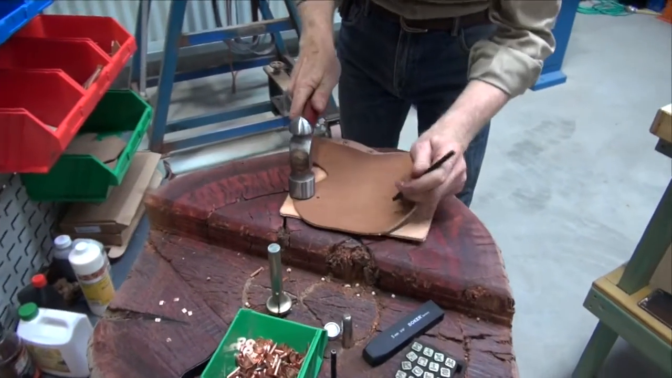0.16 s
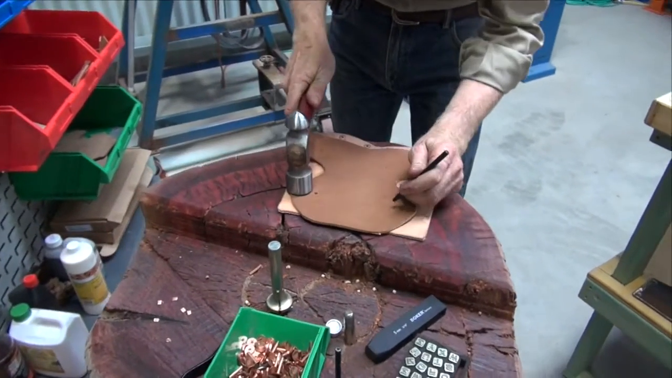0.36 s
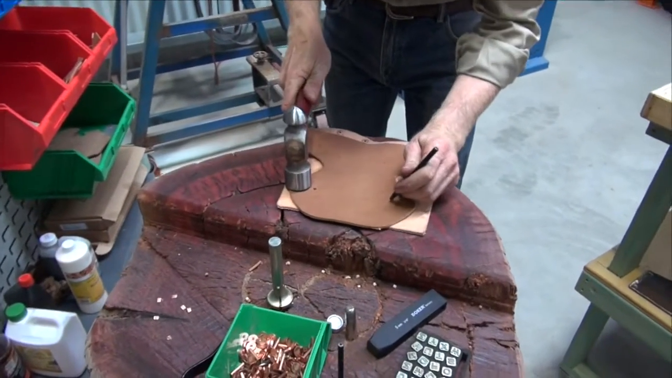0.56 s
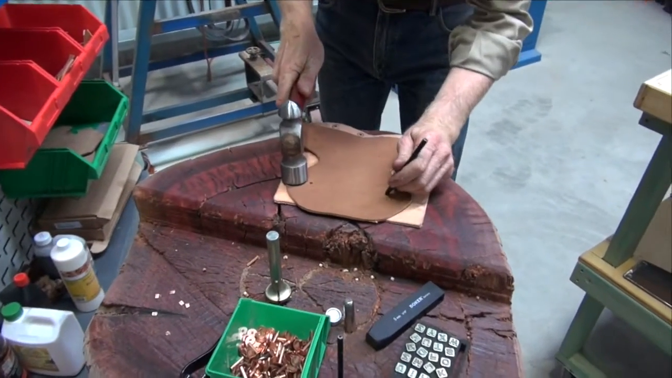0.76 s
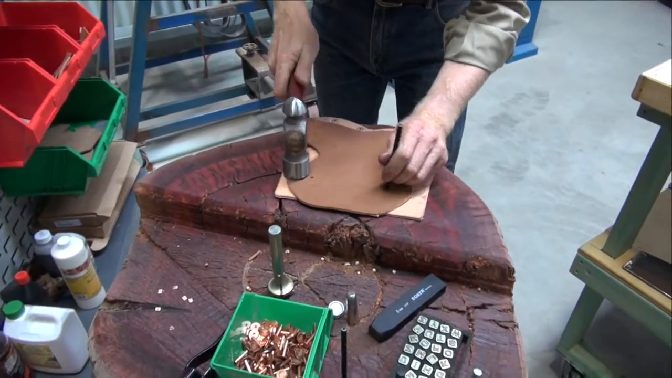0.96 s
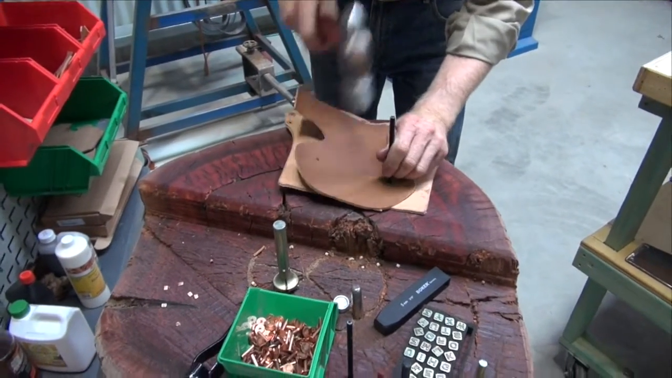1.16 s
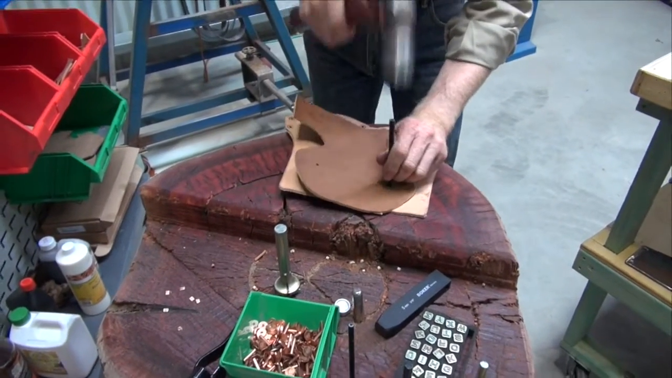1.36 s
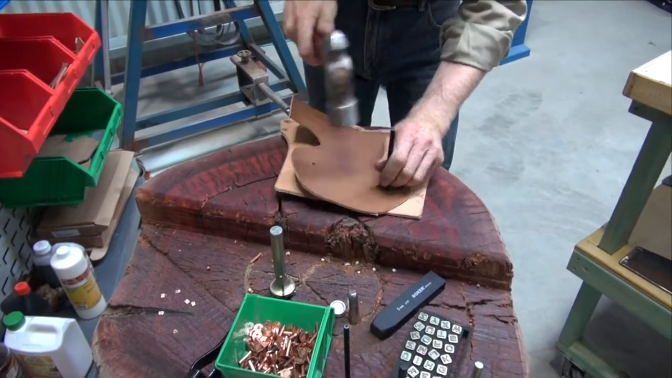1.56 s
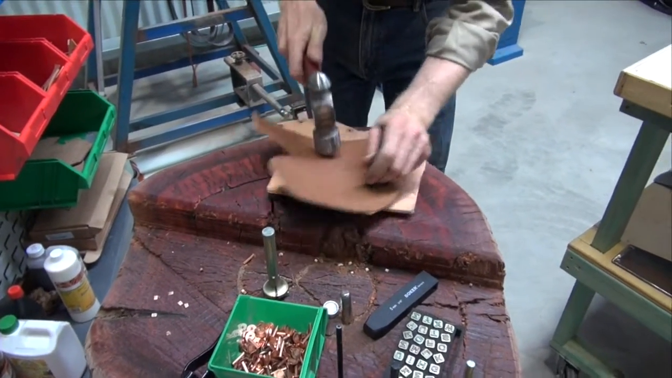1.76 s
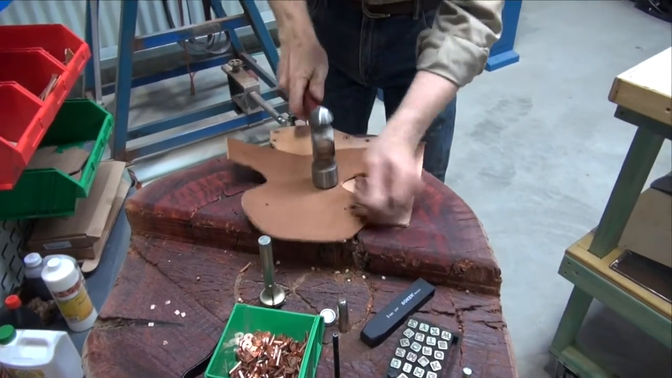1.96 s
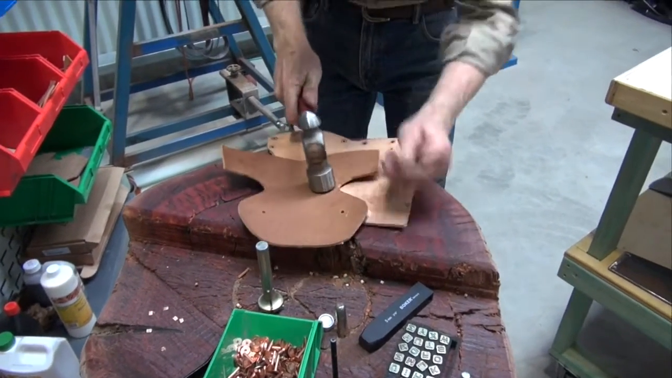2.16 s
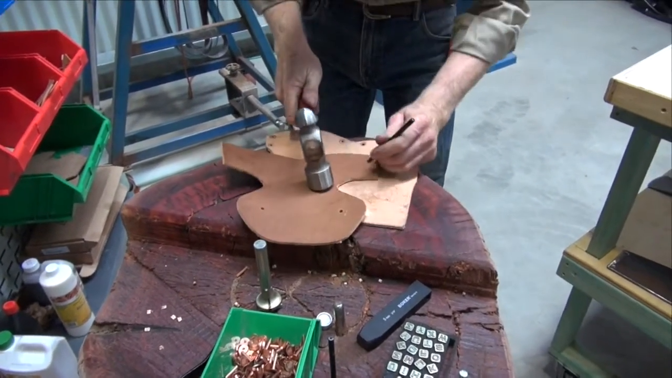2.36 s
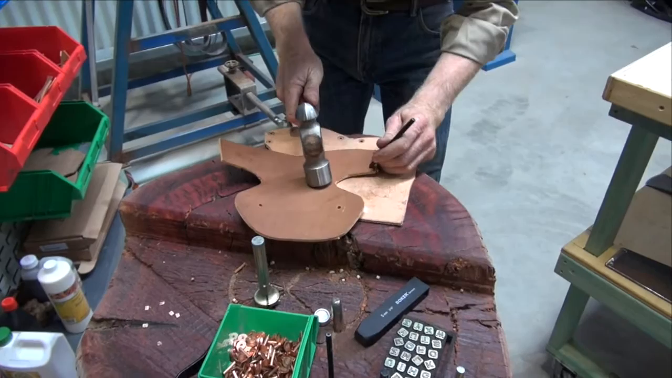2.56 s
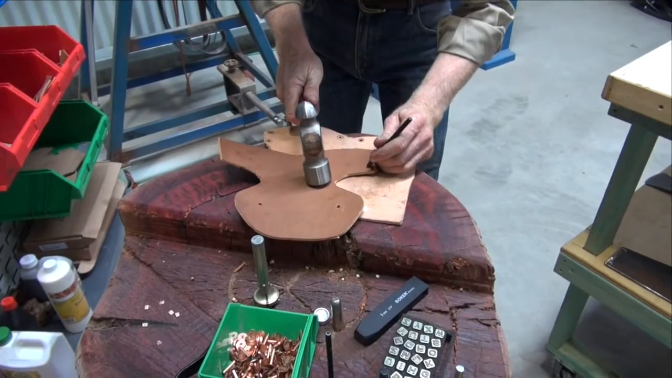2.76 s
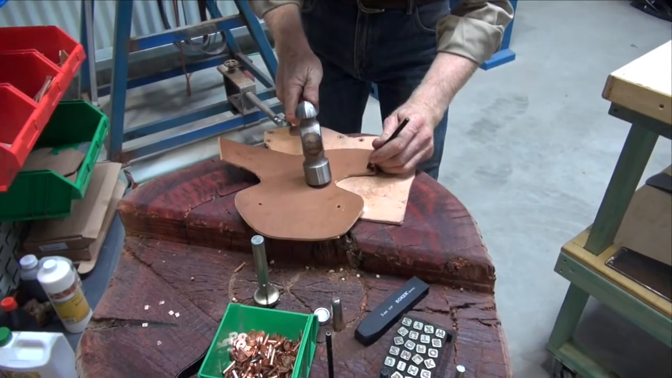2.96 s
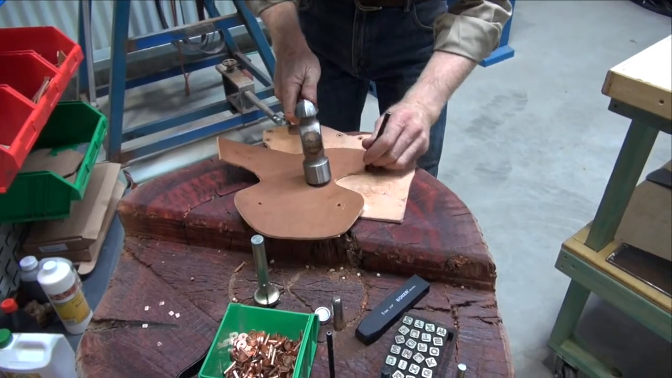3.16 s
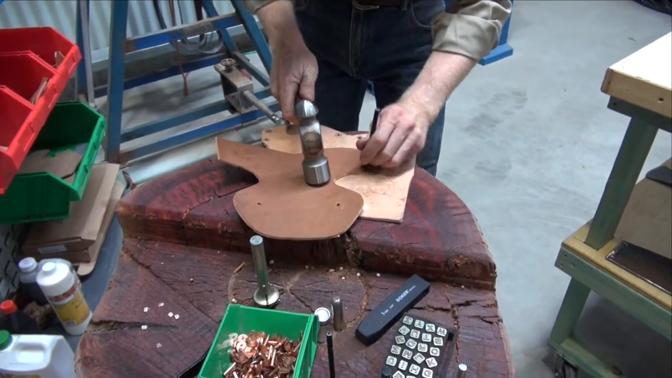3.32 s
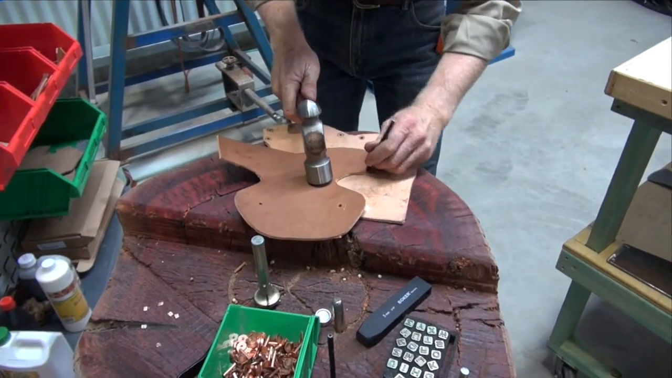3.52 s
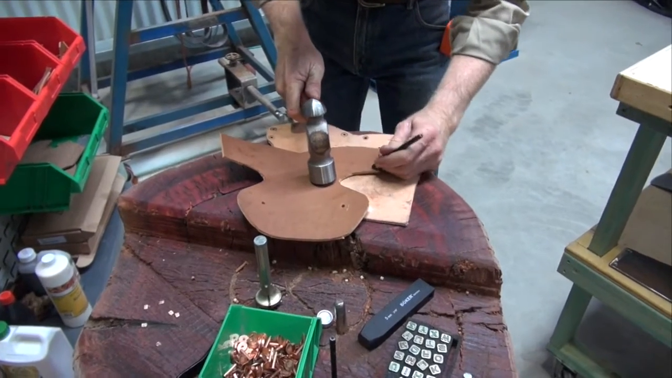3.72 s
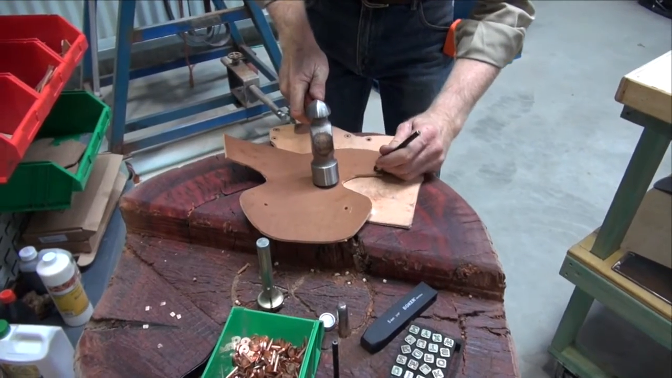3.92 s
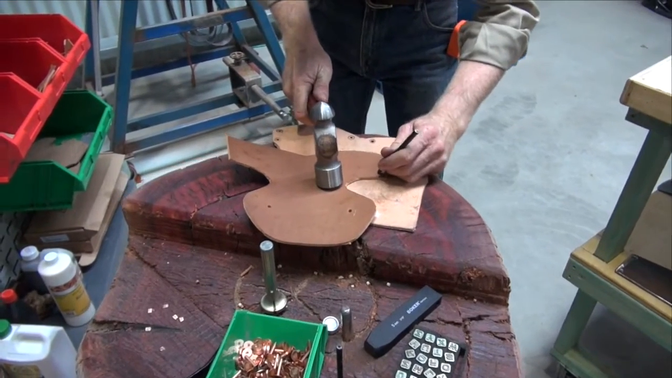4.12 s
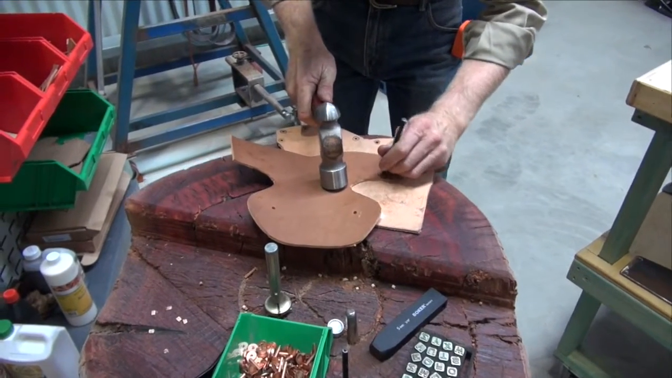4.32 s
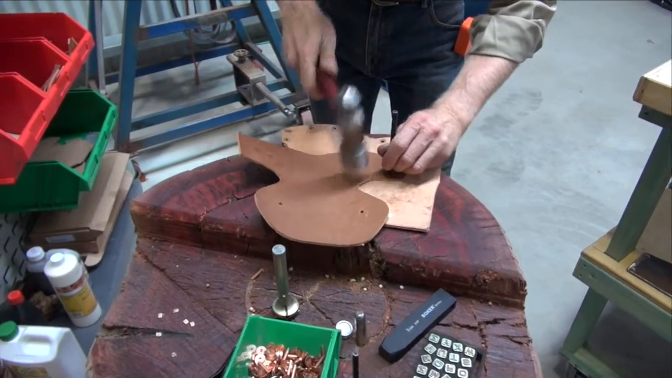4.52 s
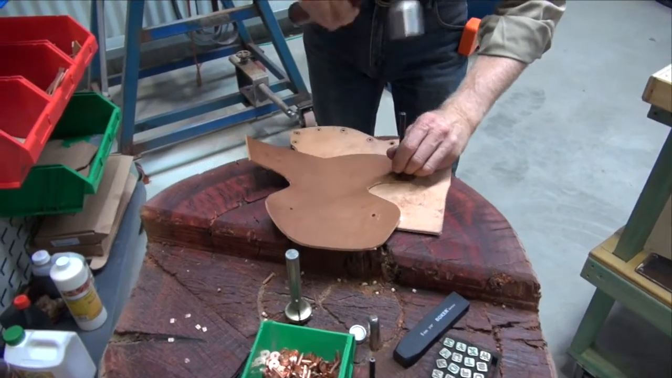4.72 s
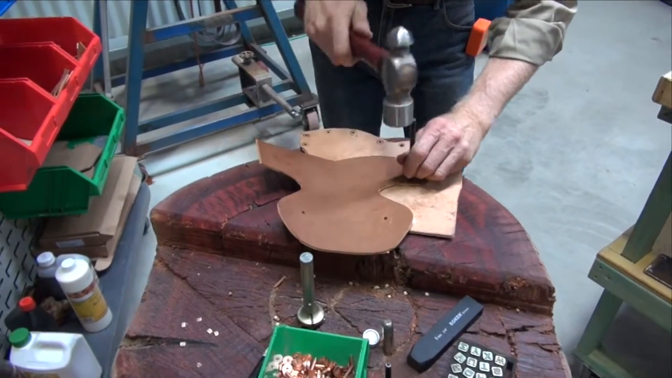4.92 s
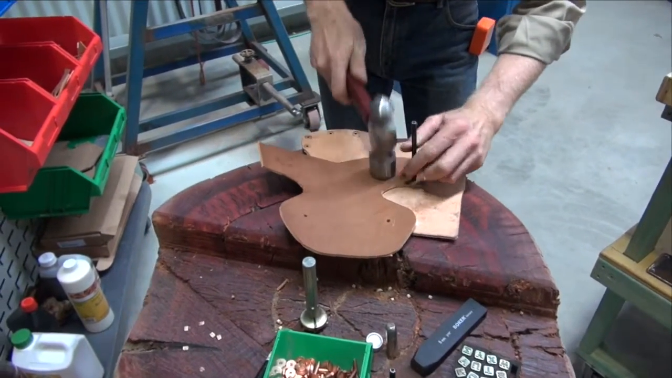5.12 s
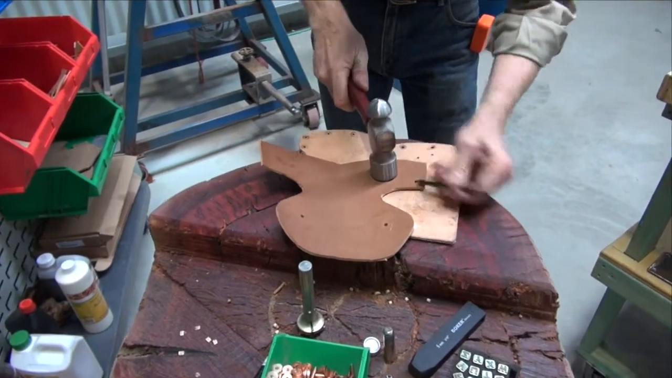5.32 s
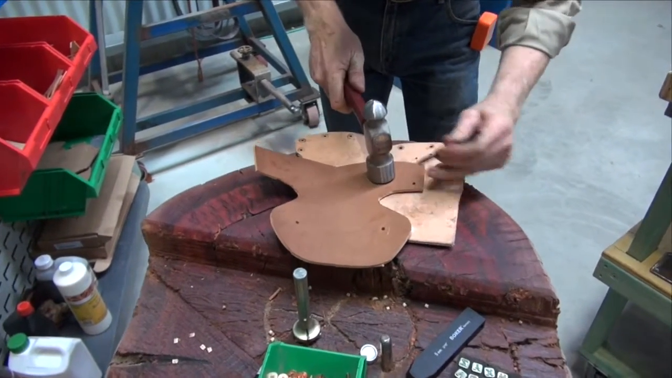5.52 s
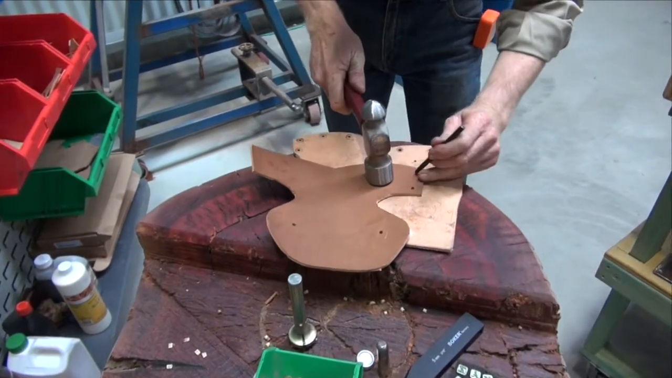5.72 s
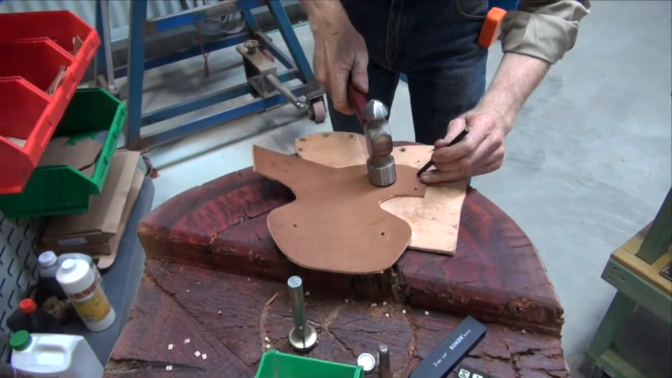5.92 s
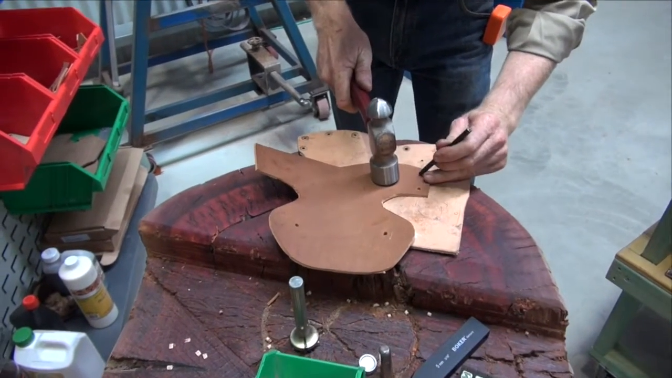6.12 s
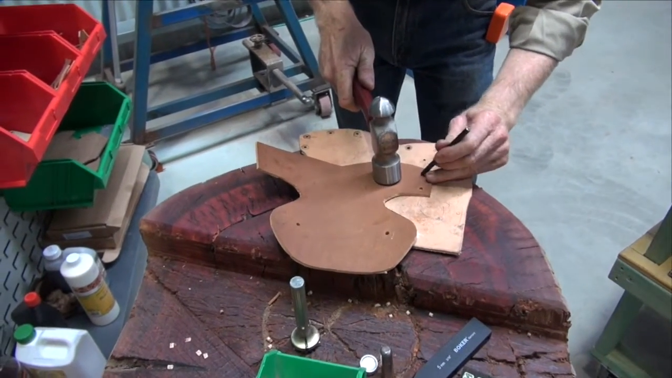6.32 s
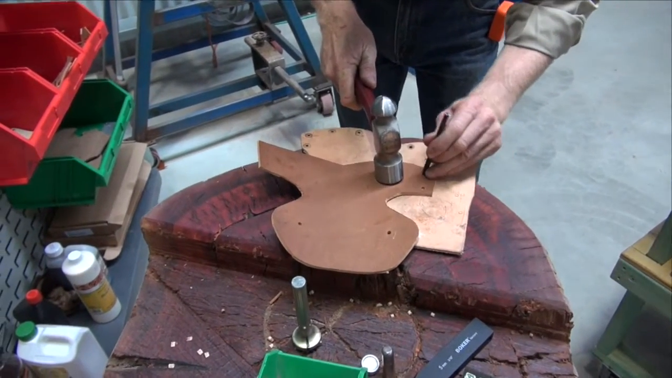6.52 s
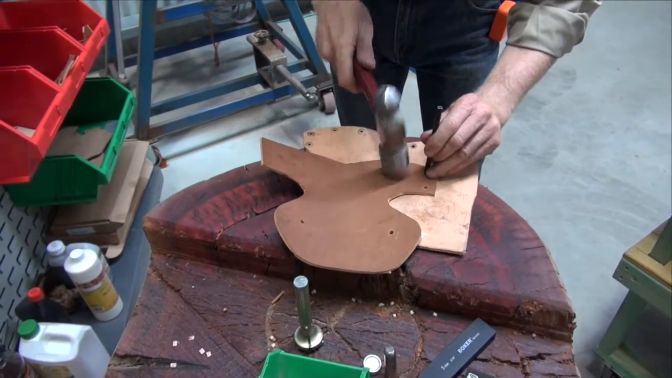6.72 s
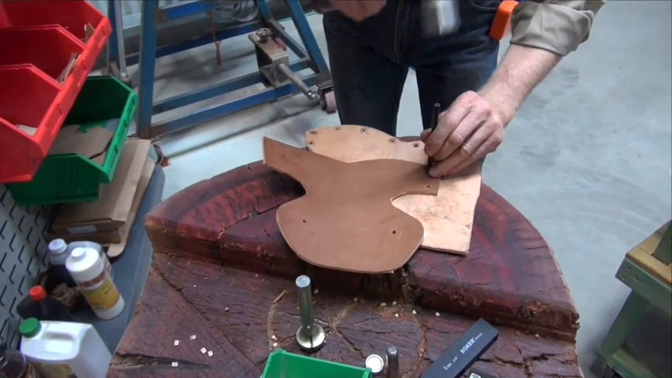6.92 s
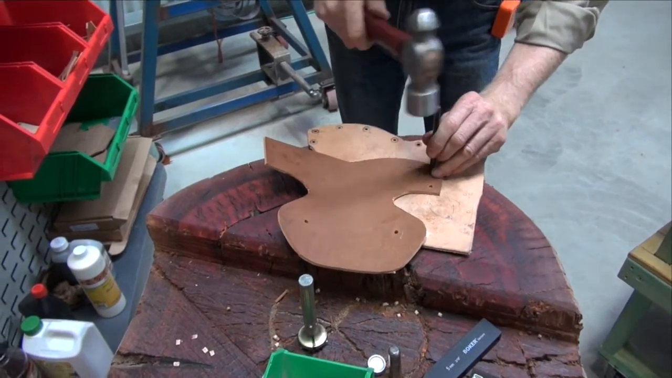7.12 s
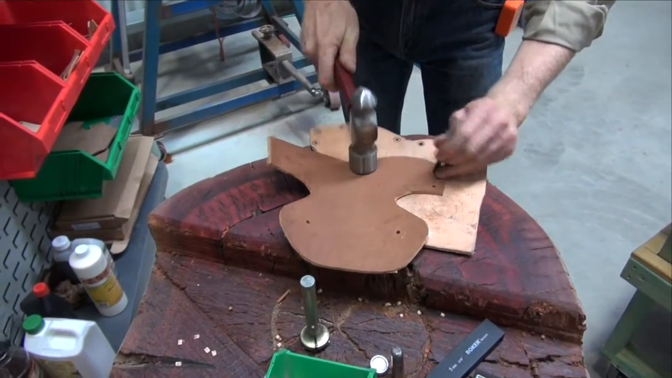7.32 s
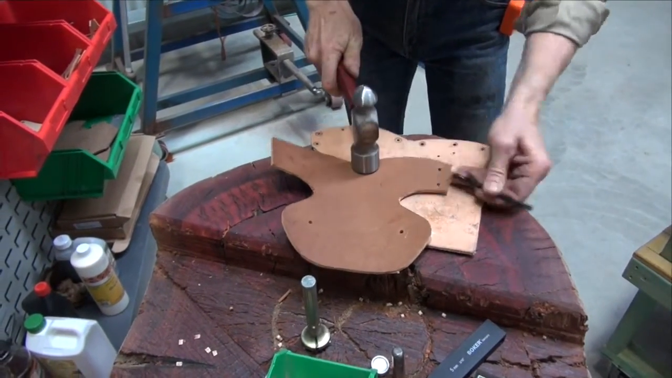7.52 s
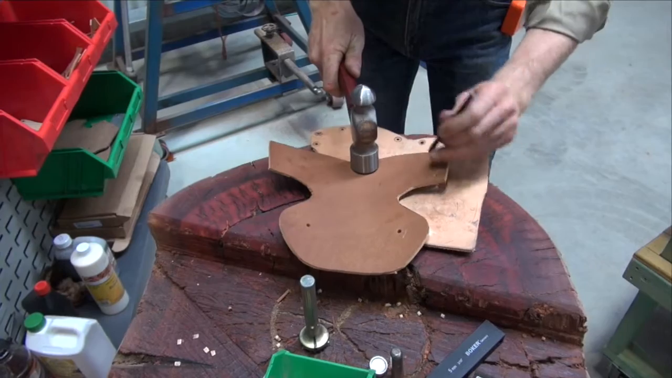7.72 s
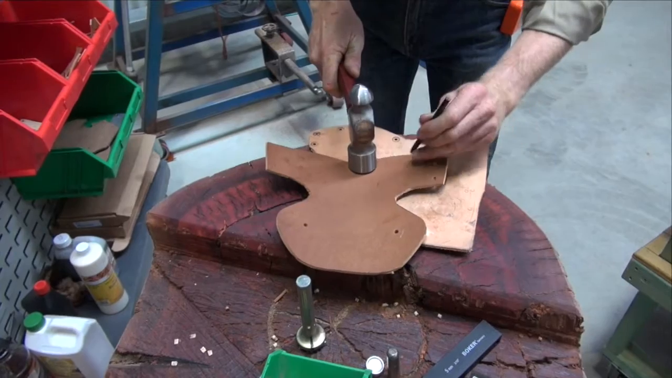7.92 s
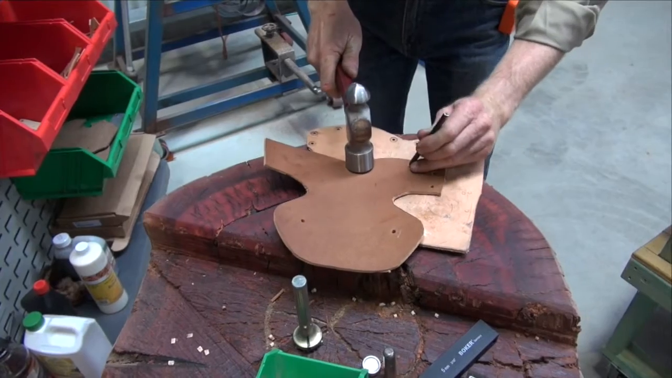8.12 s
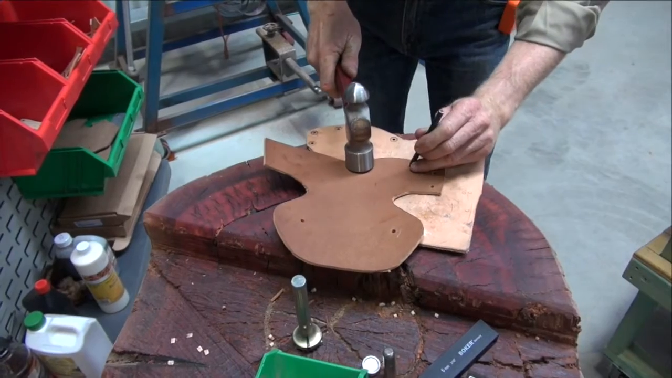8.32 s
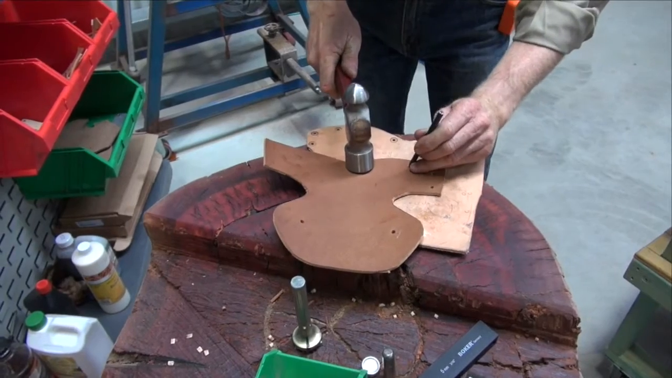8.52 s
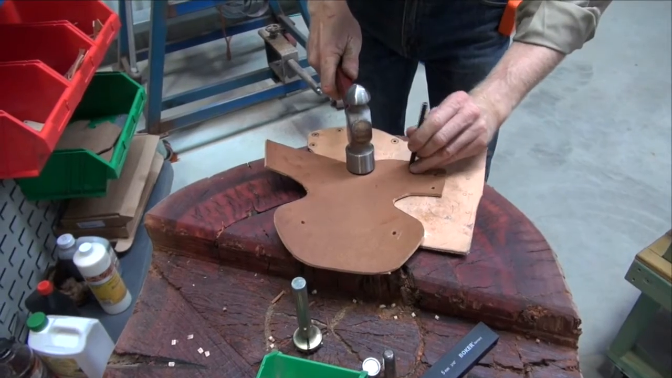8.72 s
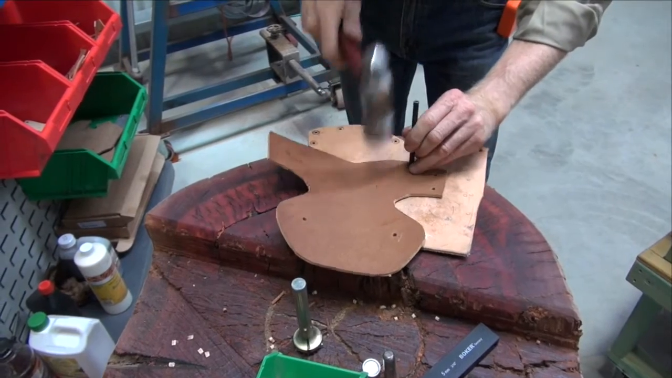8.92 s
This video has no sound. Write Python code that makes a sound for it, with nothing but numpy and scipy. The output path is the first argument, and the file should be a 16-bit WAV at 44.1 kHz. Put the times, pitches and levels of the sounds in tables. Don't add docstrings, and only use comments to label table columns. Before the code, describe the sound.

Three hard, overloaded hammer blows on a steel punch through leather, seconds apart, each followed by clattering tools and long workshop reverberation.

```python
import sys
import numpy as np
from scipy import signal
from scipy.fft import rfft, irfft
from scipy.io import wavfile

SR = 44100
rng = np.random.default_rng(int(sys.argv[2]) if len(sys.argv) > 2 else 0)


def convert_level_to_amplitude(level_db):
    exponent = np.asarray(level_db, float) / 20
    return 10 ** exponent


def persist_wave(psi):
    counts = np.round(np.clip(psi, -1, 1) * 32767).astype(np.int16)
    wavfile.write(sys.argv[1], SR, np.atleast_2d(counts).T)


N = 395577

# start_s, peak_db, tail_db, steel_ring_db
BLOWS = [
    (1.4572, 6.5, 1, -19.5),
    (4.8949, 5, 0.5, -5),
    (7.1029, 6.5, 1, -4.5),
]
# start_s, level_db
CEILING_ECHOES = [(1.4905, -16.5), (4.9254, -19.5), (7.1395, -16)]
# pitch_hz, width_hz, lift_db
STEEL_BANDS = [
    [(3820, 700, -2.5), (5900, 280, 4.5), (7250, 180, 7.5), (10000, 300, -3), (13090, 470, 9)],
    [(3960, 300, 1), (4600, 250, -3), (5900, 240, 2.5), (7528.4, 270, 7.5), (12200, 250, -13),
     (13100, 320, 13.5)],
    [(3440, 590, -1), (4870, 250, -7), (6430, 390, 2), (8400, 250, 3), (12118, 390, 0), (15000, 300, 13)],
]
# pitch_hz, level_db (per Hz)
FLASH = [(240, -46.5), (400, -24.5), (1450, -17.5), (4930, -3.5), (6030, -1.5), (7730, 3.5), (9320, -9),
         (14800, 4), (16300, -8.5)]
# pitch_hz, level_db (per Hz)
CRACK = [(88, -38), (150, -15.5), (265, -17.5), (400, -6.5), (547, -13.5), (794, -10), (1580, -11),
         (5990, -6), (10400, -4.5), (13100, -9), (16300, -27)]
# pitch_hz, level_db, t60_s
PUNCH_MODES = [(7820, -17, 0.06), (8300, -23, 0.04), (8350, -21, 0.029), (12720, -17.5, 0.035),
               (14840, -14, .005), (6060, -11, 0.014)]
# pitch_hz, level_db, t60_s
BOARD_MODES = [(260.3, -5, 0.027), (351.6, -5, 0.036), (385, -4.5, 0.042), (484.4, -2, 0.05),
               (500, -19.5, .15), (566, -4.5, 0.016), (643, -7, 0.046), (711, -5, 0.038), (825, -5, 0.034),
               (1100, -9, 0.039)]
# start_s, click_db, click_hz, board_thud_db
FIRST_DROP = [(1.7642, -16, 1110, -30), (1.9, -31.5, 980, -28), (1.9158, -27, 1800, -29),
              (1.927, -24.5, 1019, -37), (1.9442, -1.5, 1733, -20), (1.9536, -3.5, 1080, -20),
              (1.9584, -9, 3000, -10), (1.9787, -3.5, 1380, -30), (1.989, -11.5, 1430, -16),
              (1.9927, -12, 1660, -27), (1.9985, -14, 1960, -25), (2.007, -5.5, 1107, -42),
              (2.0124, -2, 2360, -16)]
SECOND_DROP = [(5.1929, 4.5, 2740, -1), (5.194, 1.5, 1350, -21), (5.1978, -17, 950, -16),
               (5.2329, -11.5, 2140, -15), (5.2381, -12, 1910, -17.5), (5.2503, -13, 1450, -21),
               (5.2571, -13, 1370, -14.5), (5.2748, -16.5, 980, -17), (5.326, -19.5, 1440, -29),
               (5.337, -11, 1510, -45), (5.3445, -10, 2680, -33), (5.3558, -20, 2800, -34),
               (5.3852, -24, 1100, -33)]
THIRD_DROP = [(7.3784, 2, 2460, -9), (7.3827, -2.5, 1120, -10), (7.3861, -8, 1030, -8),
              (7.4037, -6, 1850, -14.5), (7.431, -18, 1960, -23), (7.4356, -16, 1030, -17.5),
              (7.4425, -19, 1891, -12), (7.4549, 0.5, 2550, -16.5), (7.4658, -4, 2340, -17),
              (7.4802, -8, 2320, -22.5), (7.4902, -4.5, 2340, -18), (7.5175, -32, 900, -29.5)]
# start_s, click_db, click_hz, board_thud_db
TAPS = [(1.0936, -31.5, 2080, -51), (2.3548, -32.5, 4090, -53), (2.4078, -31, 990, -29.5),
        (2.4234, -33, 1270, -34), (2.6075, -42, 900, -35), (3.1512, -32.5, 1260, -39.5),
        (3.1577, -31, 1280, -40), (4.4747, -36, 3600, -60), (1.073, -38, 1194, -50),
        (5.6458, -44, 1210, -40), (5.6937, -30, 950, -30), (6.549, -43, 1120, -43.5),
        (7.7845, -30.5, 1095, -53), (8.0777, -41, 1074, -37), (8.1036, -36, 1060, -36),
        (8.1193, -35, 1480, -43), (8.828, -32, 1230, -51.5), (8.8903, -26.5, 4800, -50)]
# start_s, level_db
TICKS = [(1.1075, -40), (1.959, -14), (1.9793, -15), (1.9985, -27), (2.008, -21), (2.0124, -30),
         (2.599, -44), (3.6698, -35), (4.4747, -30), (5.2503, -20), (5.2571, -7), (7.3788, -12),
         (7.3831, -12), (7.7837, -22), (4.618, -37.5), (8.4606, -43.5), (8.828, -14.5), (8.8904, -26)]
# start_s, level_db
RATTLE = [(5.326, -20), (5.3375, -13), (5.346, -12), (5.355, -24), (5.3605, -21.5)]
# pitch_hz, level_db, t60_s
LOOSE_TOOL_MODES = [(1480, -4.5, 0.013), (2860, -2.5, 0.015)]
# start_s, level_db
BUMP = [(7.742, -36.5)]
# loudest_s, length_s, hiss_db, dull_scuff_db
STROKES = [(0.0, 0.074, -40.5, -55), (0.1, 0.56, -54.5, -66), (0.968, 0.024, -56, -60),
           (1.047, 0.11, -48, -60), (1.92, 0.18, -52, -51), (2.402, 0.23, -58, -58.5),
           (2.545, .12, -60, -63.5), (2.596, 0.025, -53.5, -57), (3.155, 0.041, -49, -47),
           (3.178, 0.018, -57, -56), (3.681, 0.063, -54, -55), (3.719, .05, -57, -57.5),
           (3.769, 0.046, -62, -56.5), (4.176, 0.52, -69.5, -62.5), (4.48, 0.12, -50.5, -58.5),
           (4.511, 0.026, -52, -58.5), (5.38, 0.081, -52, -55.5), (5.552, 0.24, -72, -54.5),
           (5.643, 0.056, -66, -59), (5.994, .15, -75, -61), (6.515, 0.24, -64, -58.5),
           (6.702, 0.052, -61.5, -62.5), (6.826, .15, -75, -56), (7.575, 0.26, -54.5, -67),
           (7.929, 0.19, -71.5, -58.5), (7.977, 0.09, -57, -70), (8.118, .08, -68, -61),
           (8.475, 0.13, -57.5, -59.5), (8.858, .05, -53, -65), (8.878, 0.034, -51.5, -51.5)]
# pitch_hz, level_db (per Hz)
HISS = [(1470, -26), (2500, -8.5), (3880, -1.5), (7850, -7.5), (12500, -5.5), (15500, -9), (16300, -9)]
# pitch_hz, level_db (per Hz)
SCUFF = [(120, -31), (200, -25), (396, -5), (1140, -6.5), (1350, -6.5), (2030, -9.5), (6000, -20),
         (7800, -48), (13200, -120)]
# start_s, length_s, level_db
DRAGS = [(5.592, .05, -54), (7.854, 0.044, -52.5), (7.941, .065, -56)]
# pitch_hz, level_db, t60_s
DRAG_MODES = [(1060, 4, 0.023), (1620, -5.5, .015)]
# pitch_hz, t60_s
SHOP_T60 = [(100, 1.34), (500, 1.03), (2000, 1.34), (6000, 1.33), (10000, 0.43), (16000, 0.69)]
# pitch_hz, left_minus_right_db
TAIL_BALANCE = [(60, 13), (180, 10), (550, 9.5), (1650, 12), (4970, 17), (15000, 10)]
# pitch_hz, level_db (per Hz)
EARLIER = [(88, -31), (150, 0), (349, -2.5), (392, 6.5), (1550, -10), (4550, -10.5), (15100, -17.5),
           (16300, -17)]
# pitch_hz, level_db (per Hz)
AIR = [(15, -55), (25, -43), (49, 2.5), (124, -9.5), (207, -3.5), (328, -14.5), (397, -13.5), (442, -14),
       (971, -16.5), (1240, -19), (1540, -20), (15000, -33.5), (16300, -39)]
# pitch_hz, left_minus_right_db
AIR_BALANCE = [(60, 18.5), (150, 15.5), (380, 3), (950, 2), (2380, -1.5), (5980, -2.0), (15000, -6)]

AIR_DB = -59.5
LEFT_LAG_S = 0.0006
CONTACT_HOLD_S = 0.0018
TICK_UNDER_CLICK_DB = -17
FAR_SIDE_DB, FAR_TICK_DB = -16, -28
SOFTER_IS_DULLER = 0.38
BUMP_HZ, BUMP_T60_S = 104, 0.1487
RISE_SHARE, STROKE_FALL_DB = 0.33, 16


def at_hz(points, hz):
    points = np.array(points)
    return np.interp(np.log(hz + 1e-9), np.log(points[:, 0]), points[:, 1])


def rms_one(x):
    return x / np.sqrt(np.mean(x ** 2) + 1e-20)


def colour(x, spectrum, balance=((1, 0), (2, 0))):
    hz = np.fft.rfftfreq(x.shape[-1], 1 / SR)
    gain_db = at_hz(spectrum, hz) + at_hz(balance, hz) * [[0], [-1]]
    return irfft(rfft(x) * convert_level_to_amplitude(gain_db), x.shape[-1])


def humps(x, peaks):
    hz = np.fft.rfftfreq(x.shape[-1], 1 / SR)
    lift = sum(convert_level_to_amplitude(db) / (1 + ((hz - peak_hz) / width_hz) ** 2) for peak_hz, width_hz, db in peaks)
    return irfft(rfft(x) * (1 + lift), x.shape[-1])


def ring(x, hz, t60):
    r, w = convert_level_to_amplitude(-60 / (t60 * SR)), 2 * np.pi * hz / SR
    return signal.lfilter([0, np.sin(w)], [1, -2 * r * np.cos(w), r * r], x + 1e-18)


def drift(rate):
    knots = rng.standard_normal(int(N / SR * 60) + 3)
    return np.interp(np.arange(N) / SR * min(rate, 59), np.arange(len(knots)), knots)


def smooth(x, tau_s):
    r = np.exp(-1 / (tau_s * SR))
    return signal.lfilter([1 - r], [1, -r], x)


def held(db, db_per_s):
    fall = db_per_s * np.arange(N) / SR
    return np.maximum.accumulate(db + fall, axis=1) - fall


def add(out, s, sound):
    for side, lag in enumerate((LEFT_LAG_S, 0)):
        i = round((s + lag) * SR)
        out[side, i:i + sound.shape[1]] += sound[side, :N - i]


def blows(tail):
    out, t = np.zeros((2, N)), np.arange(SR // 5) / SR
    click = 1. * (t == 0)
    drive = ring(click, 2190, 0.0092)
    for (s, db, tail_db, ring_db), (echo_s, echo_db), peaks in zip(BLOWS, CEILING_ECHOES, STEEL_BANDS):
        noise = rng.standard_normal((3, 2, len(t)))
        crack = rms_one(humps(colour(noise[0], FLASH), peaks))
        wall = rms_one(humps(colour(noise[1], FLASH), peaks))
        ceiling = rms_one(humps(colour(noise[2], CRACK), peaks))

        crack = crack * convert_level_to_amplitude(-60 * np.maximum(t - CONTACT_HOLD_S, 0) / 0.0094)
        struck = click + 0.11 * crack
        rings = sum(convert_level_to_amplitude(m_db + ring_db) * ring(struck, m_hz, t60) for m_hz, m_db, t60 in PUNCH_MODES)
        near = crack * convert_level_to_amplitude([[7.5], [-28]]) + rings * convert_level_to_amplitude([[11], [-10.5]]) + drive * convert_level_to_amplitude([[0.], [-17]])
        add(out, s, convert_level_to_amplitude(db) * near)

        wall_shape = (t / 0.0017) * np.exp(-t / 0.0026)
        add(out, s + 0.0032, convert_level_to_amplitude(db) * wall * wall_shape * convert_level_to_amplitude([[-14.], [-20.5]]))

        rise = t / 0.0006
        slap = convert_level_to_amplitude(2.5) * ceiling * rise * np.exp(-rise) + convert_level_to_amplitude(-1.5) * ring(click, 6000, 0.01)
        add(out, echo_s, slap * convert_level_to_amplitude(echo_db + np.array([[14], [3.]])))
        add(out, s, convert_level_to_amplitude(tail_db - 15.5) * humps(colour(tail, CRACK), peaks))
    return out


def knocks():
    (sharp, deep), t = np.zeros((2, 2, N)), np.arange(SR // 8) / SR
    rows = FIRST_DROP + SECOND_DROP + THIRD_DROP + TAPS
    chance = rng.standard_normal((len(rows), 2, len(BOARD_MODES)))
    grit = rng.standard_normal((len(rows) + len(TICKS), 2, len(t)))
    treble = signal.butter(2, 3400, "high", fs=SR, output="sos")
    ticks = signal.sosfilt(treble, grit) * convert_level_to_amplitude(-60 * t / 0.0067)
    push = (t < 0.0007) * np.sin(np.pi * t / 0.0007) / (0.00065 * SR)
    modes = np.array([convert_level_to_amplitude(m_db) * ring(push, m_hz, t60) * (-1) ** k
                      for k, (m_hz, m_db, t60) in enumerate(BOARD_MODES)])

    for (s, db, hz, thud_db), luck, noise, tick in zip(rows, chance, grit, ticks):
        contact = (t == 0) + 0.081 * noise * convert_level_to_amplitude(-60 * t / 0.02)
        give_hz = min(10.0 * hz * convert_level_to_amplitude(SOFTER_IS_DULLER * db), 0.4 * SR)
        contact = signal.sosfilt(signal.butter(1, give_hz, fs=SR, output="sos"), contact)
        click = ring(contact, hz, 6.25 / hz)
        click = click + convert_level_to_amplitude(-3.0) * ring(contact, 1.76 * hz, 0.0015)
        click = click - convert_level_to_amplitude(-5.5 + SOFTER_IS_DULLER * db) * ring(contact, 4120, 0.0011)
        click = click + convert_level_to_amplitude(TICK_UNDER_CLICK_DB - 4.5) * tick
        add(sharp, s, convert_level_to_amplitude(db + 2.5) * click * convert_level_to_amplitude([[0], [FAR_SIDE_DB]]))
        add(deep, s, convert_level_to_amplitude(thud_db) * convert_level_to_amplitude(4.1 * luck) @ modes * convert_level_to_amplitude([[0], [-6]]))

    for (s, db), tick in zip(TICKS, ticks[len(rows):]):
        add(sharp, s, convert_level_to_amplitude(db - 6) * tick * convert_level_to_amplitude([[0], [FAR_TICK_DB]]))
    tool = sum(convert_level_to_amplitude(m_db) * ring(t == 0, m_hz, t60) for m_hz, m_db, t60 in LOOSE_TOOL_MODES)
    for s, db in RATTLE:
        add(sharp, s, convert_level_to_amplitude(db) * tool * convert_level_to_amplitude([[0], [-13]]))

    thin = signal.butter(3, 170, "high", fs=SR, output="sos")
    sharp, deep = signal.sosfilt(thin, sharp), signal.sosfilt(thin, deep)
    for s, db in BUMP:
        add(deep, s, convert_level_to_amplitude(db) * ring(push, BUMP_HZ, BUMP_T60_S) * convert_level_to_amplitude([[0], [-8]]))
    return sharp, deep


def rubs():
    t, hiss_gain, scuff_gain = np.arange(N) / SR, np.zeros(N), np.zeros(N)
    for s, length, hiss_db, scuff_db in STROKES:
        start, end = s - 3 * RISE_SHARE * length, s + 3 * (1 - RISE_SHARE) * length
        away = np.interp(t, [start, s, end], [3, 0, 3])
        shape = convert_level_to_amplitude(-STROKE_FALL_DB * away) * (away < 3)
        hiss_gain += convert_level_to_amplitude(hiss_db) * shape
        scuff_gain += convert_level_to_amplitude(scuff_db) * shape
    grit = rng.standard_normal((2, 2, N)) * convert_level_to_amplitude(0.97 * rng.exponential(1, (2, 1, N)))
    hiss = rms_one(colour(grit[0], HISS)) * hiss_gain * convert_level_to_amplitude(1.3 * drift(33))
    scuff = rms_one(colour(grit[1], SCUFF)) * scuff_gain * convert_level_to_amplitude(2.4 * drift(40))
    return hiss * convert_level_to_amplitude([[5], [-7]]) + scuff * convert_level_to_amplitude([[5], [-4]])


def drags():
    t = np.arange(N) / SR
    slips = rng.standard_normal(N) * (rng.random(N) < 400 / SR)
    rings = rms_one(sum(convert_level_to_amplitude(db) * ring(slips, hz, t60) for hz, db, t60 in DRAG_MODES))
    gain = np.zeros(N)
    for s, length, db in DRAGS:
        corners_s = [s, s + 0.0065, s + length, s + length + 0.022]
        gain += np.interp(t, corners_s, [0, convert_level_to_amplitude(db), 0.52 * convert_level_to_amplitude(db), 0])
    return rings * gain * convert_level_to_amplitude([[4], [-6]])


def shop_tail():
    t, out = np.arange(int(1.6 * SR)) / SR, 0
    edges = 70 * 2 ** np.arange(0, 8.1, 0.5)
    white = rng.standard_normal((2, 2, len(t)))
    for k, (low, high) in enumerate(zip(edges, edges[1:])):
        band = signal.sosfilt(signal.butter(2, [low, high], "band", fs=SR, output="sos"), white[k % 2])
        out = out + band * convert_level_to_amplitude(-60 * t / at_hz(SHOP_T60, np.sqrt(low * high)))
    onset = 1 - np.exp(-t / 0.0011)
    return colour(out * onset, [(50, 0.011), (16000, 0.005)], TAIL_BALANCE)


def earlier_knocking(tail):
    earlier = colour(tail[:, SR // 10:], EARLIER)
    return convert_level_to_amplitude(-44) * earlier / np.std(earlier[0, :SR // 10])


def air():
    tone = colour(rng.standard_normal((2, N)), AIR, AIR_BALANCE)
    tone = convert_level_to_amplitude(AIR_DB) * tone / np.std(tone.mean(axis=0))
    bass = signal.sosfiltfilt(signal.butter(2, 300, fs=SR, output="sos"), tone)
    lumps = convert_level_to_amplitude(2.0 * drift(3.7) + 0.24 * drift(11))
    return tone + bass * (lumps - 1)


def scene():
    tail, (sharp, deep) = shop_tail(), knocks()
    hands = rubs() + drags()
    sent = convert_level_to_amplitude(-57.5) * sharp[0] + convert_level_to_amplitude(-48.5) * deep[0] + convert_level_to_amplitude(-49.5) * hands[0]
    answer = signal.fftconvolve(sent[None], tail, axes=1)[:, :N]
    out = blows(tail) + sharp + deep + hands + answer + air()
    add(out, 0, earlier_knocking(tail))
    return out


def low_pass(x):
    return signal.sosfilt(signal.butter(12, 16430, fs=SR, output="sos"), x)


def record(dry):
    over_db = np.maximum(20 * np.log10(np.abs(dry) + 1e-9) - 1.5, 0)
    duck_db = 1.15 * smooth(np.maximum(held(over_db, db_per_s=177.5), 0), 0.002)
    x = dry * convert_level_to_amplitude(-duck_db)

    excess = np.clip(np.abs(dry) - 0.8, 0, 0.4)
    overload = np.clip(smooth(excess, 0.002) * 30, 1e-4, 1)
    x = x - 0.047 * smooth(convert_level_to_amplitude(held(20 * np.log10(overload), db_per_s=216.0)), 0.0049)

    top = signal.cheby2(10, 30, 16350, fs=SR, output="sos")
    x = signal.sosfilt(top, np.clip(x, -1, 1))
    return low_pass(np.clip(x, -1, 1))


dry = scene()
out = record(dry)
persist_wave(out)
```